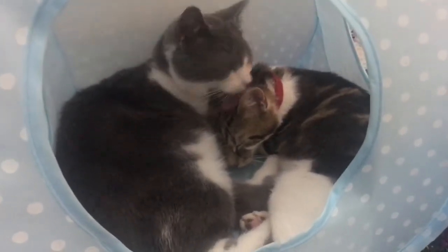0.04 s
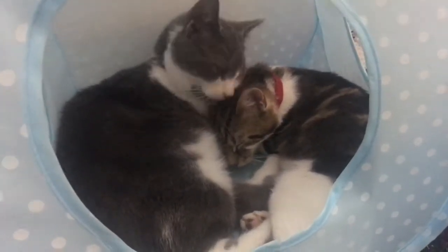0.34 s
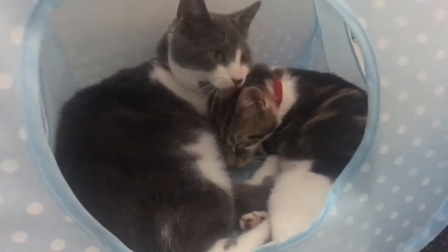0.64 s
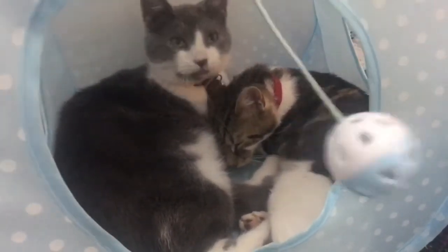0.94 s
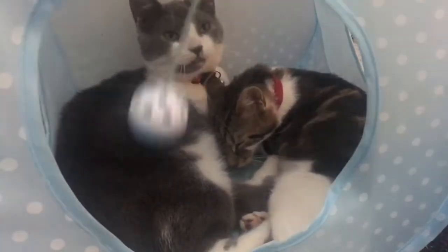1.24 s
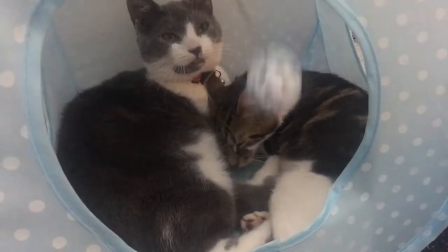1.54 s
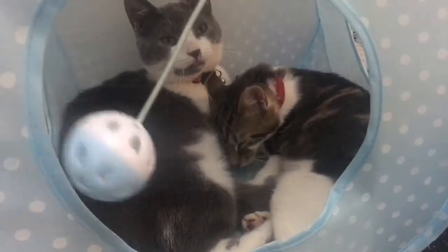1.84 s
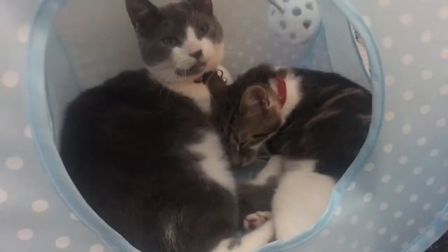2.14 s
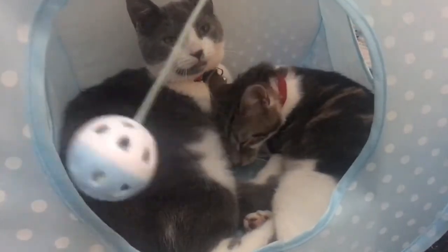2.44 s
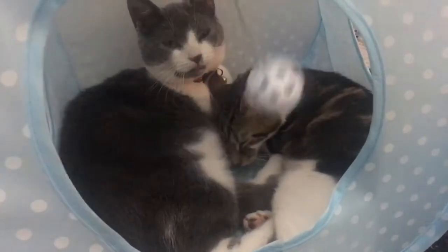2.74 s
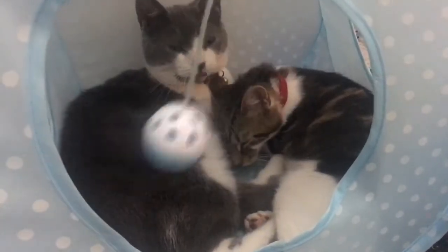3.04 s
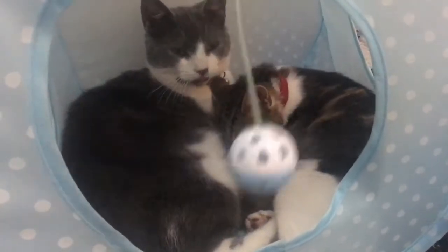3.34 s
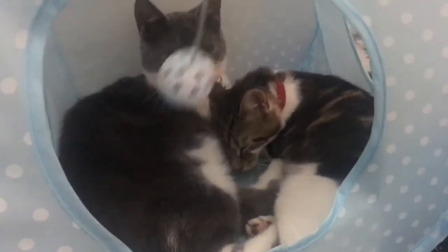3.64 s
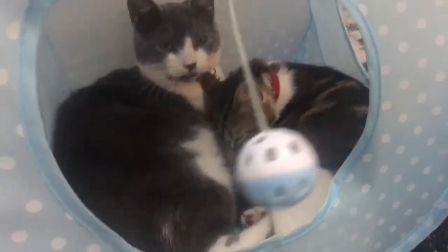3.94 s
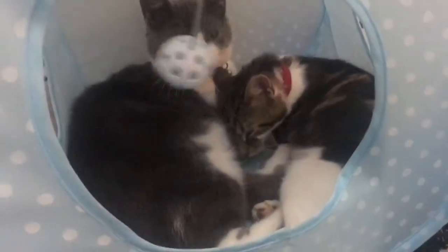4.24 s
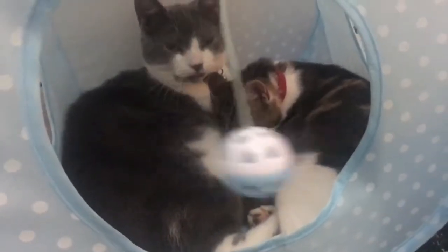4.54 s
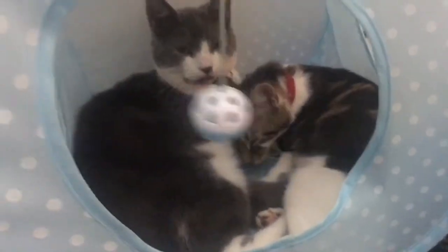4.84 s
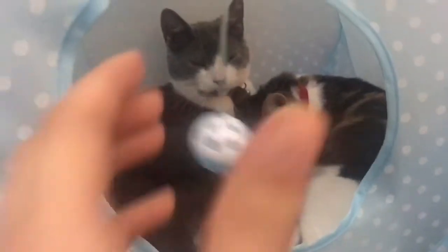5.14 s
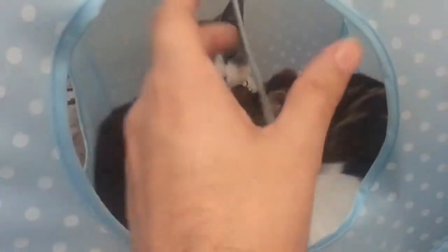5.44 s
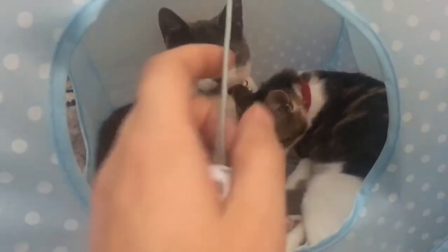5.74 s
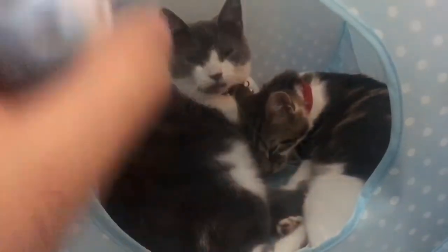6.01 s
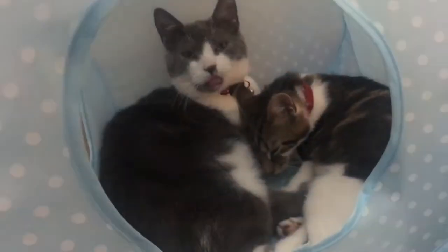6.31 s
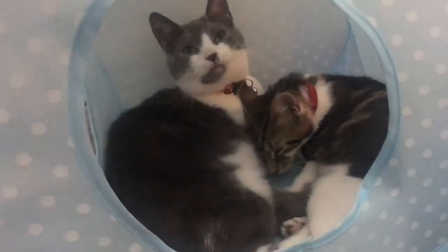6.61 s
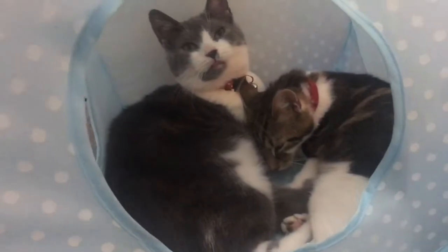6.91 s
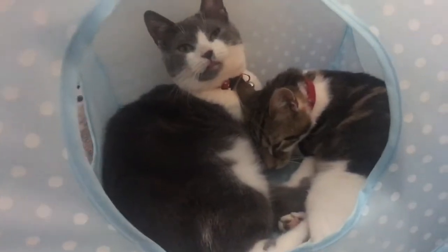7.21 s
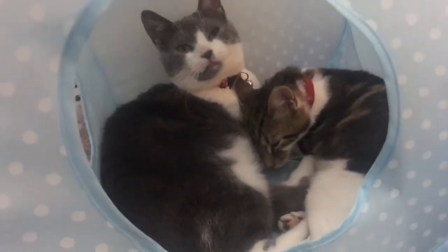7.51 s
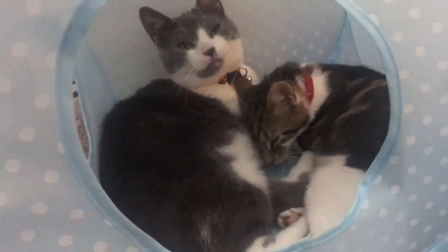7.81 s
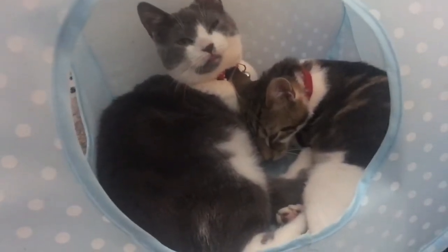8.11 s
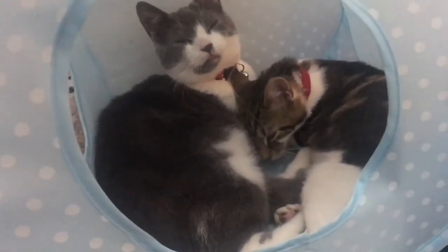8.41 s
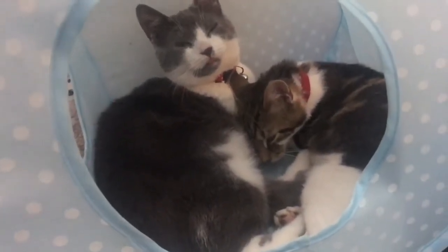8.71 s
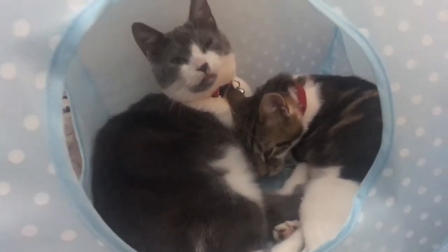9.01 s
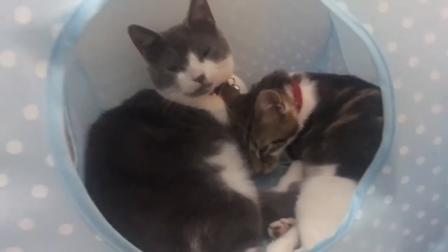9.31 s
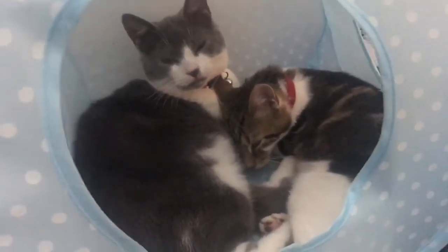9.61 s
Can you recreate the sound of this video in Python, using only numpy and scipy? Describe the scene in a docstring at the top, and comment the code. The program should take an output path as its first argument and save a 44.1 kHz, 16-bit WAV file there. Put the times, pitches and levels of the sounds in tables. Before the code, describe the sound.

A small metal bell inside a plastic toy ball is heard close up in a quiet room. At about 0.4 seconds the ball is jerked on its string, and the bell gives a bright, high jingle with plastic clicks and a soft thud, dying down by 1 second. Very faint, sparse tinkles continue until about 3 seconds as it swings. Dull low rumbles and a few soft handling bumps follow, with a sharper tap near 4.7 seconds and faint brushing around it. From about 5.5 to 6.1 seconds a hand grabs the ball and the bell rattles busily, its pellet hopping and rolling. Lighter tinkles and soft brushes go on until 7.5 seconds, with a last tiny one near 8. A dry tick comes near 8.9 seconds and a soft bump near 9.7, over a steady low hush.

```python
"""A pellet bell jingles inside a plastic lattice ball, swung on a string close by in a quiet room.
The ball is jerked, tinkles faintly as it swings, then rattles in a hand and settles.
The pellet strikes, hops and rolls in a slit steel shell, ringing its modes; the bell clicks on the
plastic. Soft bumps, ticks and brushes of handling and some dull rumbles lie over the room's hush."""
import sys
import numpy as np
from scipy import signal
from scipy.fft import rfft, irfft, next_fast_len
from scipy.io import wavfile
from scipy.ndimage import uniform_filter1d

SR = 44100
rng = np.random.default_rng(int(sys.argv[2]) if len(sys.argv) > 2 else 0)


def file_out(sig):
    """Save sig as 16-bit WAV at sys.argv[1]."""
    # one column per channel
    cols = np.atleast_2d(sig).T
    # limit, then scale
    lim = np.clip(cols, -1, 1)
    pcm = np.round(lim * 32767).astype(np.int16)
    wavfile.write(sys.argv[1], SR, pcm)


N = 434826
T = np.arange(N) / SR
GRABBED_S = 5.4  # ball held from here on
REST_DB = -88  # no hops or pings below this roll level


# Pellet strikes, relative levels:
# (time [s], clash [dB], 8 kHz partials [dB], upper note [dB], lower note [dB], plastic click [dB])
STRIKES = [(.402, -37, -41, -43, -52, -41), (.41, -11.5, -35, -43, -40, -29.5),
           (.4206, -12.5, -19, -28.5, -55, -41), (.4316, -14, -18, -46, -49, -33),
           (.4387, -11, -16.5, -34, -59, -25), (.4706, -8, -11, -33.5, -33.5, -37),
           (.4873, -8, -19, -43, -53, -24.5), (.4967, -12, -36, -35, -52, -39),
           (.5191, -15, -45, -53, -51, -53), (.5667, -28, -31.5, -59, -53, -38),
           (.5746, -21.5, -52, -41, -45, -43), (.5988, -30, -39, -44, -54, -47),
           (.633, -34, -36.5, -51, -53, -42.5), (.714, -22, -23.5, -63, -53, -61),
           (.73, -19, -26, -44.5, -58, -54), (.7592, -18.5, -40, -34, -53, -45),
           (.767, -16.5, -36, -39, -46.5, -62), (.791, -19.5, -51, -49, -53, -63),
           (.874, -37, -66, -51.5, -70, -47), (.946, -39, -62, -51, -75, -66),
           (1.0065, -45, -53, -59, -75, -59), (1.0768, -33.5, -61, -79, -74, -47),
           (1.1103, -35, -61, -69, -75, -52.5), (1.1949, -50, -72, -80, -85.5, -70.5),
           (1.6196, -59.5, -83, -85.5, -87, -77.5), (1.733, -59, -81.5, -88, -84, -77),
           (1.94, -56, -87.5, -80, -79, -75), (2.4703, -56, -81, -85, -90, -78),
           (2.5536, -50.5, -80, -76.5, -86.5, -69.5), (2.6887, -55.5, -78.5, -78, -87, -76),
           (2.906, -54.5, -85.5, -85, -81, -78.5), (3.0344, -58.5, -80, -82.5, -83, -78),
           (5.5536, -37, -52, -47.5, -60, -46), (5.5847, -31, -35, -46, -69, -41),
           (5.6032, -23, -39, -36, -68, -38.5), (5.645, -29, -55, -46, -39, -75),
           (5.688, -20, -45, -64, -43, -72), (5.7355, -23, -31.5, -54, -50, -68),
           (5.7675, -19, -41, -51, -60, -39), (5.7783, -21, -46, -35.5, -57, -37.5),
           (5.7924, -18, -34, -35, -41, -36), (5.8105, -20, -42, -32, -46, -32.5),
           (5.8262, -11.5, -30, -44, -40, -42), (5.8375, -29, -25.5, -43, -38, -38),
           (5.8515, -18.5, -31, -45, -44, -47), (5.8824, -20, -44, -52, -45, -62),
           (5.897, -15.5, -49, -54, -40, -58), (5.9269, -20, -47, -31.5, -57, -35),
           (5.9564, -33, -57, -38, -68, -36), (5.9762, -17.5, -42, -37, -51, -41),
           (6.0145, -17.5, -57, -56, -48, -51), (6.0355, -26, -48, -56, -66, -43),
           (6.092, -27, -55, -41.5, -63, -66), (6.123, -26, -62, -41, -69, -61),
           (6.3075, -39.5, -60, -58, -73, -53), (6.3529, -49, -51.5, -76, -81, -52.5),
           (6.4338, -39, -55, -71, -81, -62), (6.4911, -40, -45, -56, -68, -67),
           (6.5525, -30, -58, -72, -60, -52), (6.755, -43, -69, -64, -73, -63),
           (6.833, -29.5, -60, -55, -61, -47.5), (6.8628, -32, -59, -66, -54, -51),
           (6.9046, -32, -52, -61, -64, -74), (6.9848, -38, -50, -55, -48.5, -56),
           (7.0668, -44, -47, -56, -58, -49.5), (7.1901, -39, -74, -50, -70, -45),
           (7.222, -51, -69, -46, -57.5, -54), (7.4607, -46, -63.5, -64, -83, -59),
           (7.4723, -49, -54, -64, -58.5, -57), (8.05, -45.5, -69.5, -67.5, -70, -62)]
# Slit steel shell modes: (frequency [Hz], level [dB], t60 [s])
BELL_MODES = [(2972, 0, .22), (3510, -7, .25), (4696, 0, .4), (4716, -4, .3), (4808, -4, .35),
              (5324, 0, .5), (5350, -4, .3), (8386, -4, .12), (8690, -3, .05), (8735, -4, .07),
              (8895, -1, .05), (9465, -10, .06), (10090, -5, .05), (10820, -9, .08), (11014, -2, .19),
              (11280, -6, .06), (11480, -7, .07), (11855, -7, .15), (12140, -5, .15), (12525, -6, .08),
              (12770, -2, .08), (12910, 0, .19), (13765, -4, .07), (13980, -6, .07), (14700, -10, .05)]
# Edges between the deep, lower, upper, 8 kHz and shimmer mode families: (frequency [Hz])
FAMILY_EDGES_HZ = [4000, 5000, 7000, 9300]
def bell(hits, gentle_db=-58, hard_db=-31, held_damping=1.15, detune=0.000799, max_samples=12000):
    """Each strike hits a new spot, rings a new detuned mix of modes and partly chokes the old ring."""
    hz, db, t60 = np.transpose(BELL_MODES)
    family = np.digitize(hz, FAMILY_EDGES_HZ)
    hits = sorted(hits)
    ends_s = [hit[0] for hit in hits[1:]] + [T[-1]]
    out, state = np.zeros(N), np.zeros(len(hz), complex)
    for (s, clash_db, partials_db, upper_db, lower_db, click_db), end_s in zip(hits, ends_s):
        softness = np.interp(clash_db, [gentle_db, hard_db], [1, 0])
        spot = undb(db + 5.5 * rng.standard_normal(len(hz)))
        mix = spot * t60 ** (0.68 * softness)  # light touches favour long-ringing modes
        mix /= np.sqrt(np.bincount(family, mix ** 2))[family]
        shimmer_db = clash_db - 14 - 0.3 * (max(clash_db, gentle_db) + 30.5)
        deep_db = (click_db + lower_db) / 2 - 4 - 20 * rng.random()  # woken by knocks on the plastic
        force = undb([deep_db, lower_db - 3, upper_db - 3, partials_db - 3, shimmer_db])[family]
        surviving = 0.46 ** max(1 - softness, 0.18)
        state = surviving * state + force * mix * rng.choice([-1, 1], len(hz))
        detuned_hz = hz * (1 + detune * rng.standard_normal(len(hz)))
        damping = 1 if s < GRABBED_S else held_damping
        step = np.exp((2j * np.pi * detuned_hz - np.log(1000) * damping / t60) / SR)
        n = np.clip(int(end_s * SR) - int(s * SR), 1, max_samples)
        ring = state * np.cumprod(np.broadcast_to(step, (n, len(hz))), axis=0)
        add(out, s, ring.imag.sum(axis=1))
        state = ring[-1]
    return out


# Metal clash spectrum: (frequency [Hz], level [dB])
CLASH_SPECTRUM = [(6000, -15.5), (7700, -15), (8600, -5), (9400, -3.5), (10050, -0.5), (10500, -6.5),
                  (11300, 7.5), (12800, 4), (13300, -5.5), (13800, -2), (16000, -7)]
def clash(t60_s, count=9, size=1024):
    """While the pellet presses on the steel, the high modes are detuned and die at once."""
    t = T[:size]
    hz = rng.uniform(6400, 15800, count)
    gain = undb(np.interp(hz, *np.transpose(CLASH_SPECTRUM))) * rng.standard_normal(count)
    partials = np.sin(2 * np.pi * (hz[:, None] * t + rng.random((count, 1))))
    return gain @ partials / np.linalg.norm(gain) * fade(t, t60_s)


# Plastic click spectrum: (frequency [Hz], level [dB])
PLASTIC_SPECTRUM = [(150, -18), (500, -8.5), (1200, -4.5), (2500, -0.5), (4000, 1.5), (6500, 4), (9000, -8),
                    (16000, -32.5)]
def contacts(hits, free_t60_s=0.028, held_t60_s=0.014, bounce_gap_s=(0.0011, 0.0036), bounce_db=-7):
    """The pellet hits the steel: a metal clash with two rebounds, shorter when held.
    The bell clicks on the plastic."""
    out = np.zeros(N)
    for s, clash_db, *_, click_db in hits:
        t60_s = free_t60_s if s < GRABBED_S else held_t60_s
        first_db = clash_db - 7 + min(clash_db + 45, 0) / 2  # the lightest touches hardly clash
        for bounce, lag_s in enumerate(np.cumsum([0, *rng.uniform(*bounce_gap_s, 2)])):
            add(out, s + lag_s, undb(first_db + bounce * bounce_db) * clash(t60_s))
        click = burst(0.0052, PLASTIC_SPECTRUM)
        rattle = undb(-17) * burst(0.0418, PLASTIC_SPECTRUM)
        add(out, s, undb(click_db + 6) * (click + rattle))
    return out


# Pellet rolls, one per toss or turn: (time [s], length [s], level [dB])
ROLLS = [(0.197, 0.1, -72.5), (0.395, 0.023, -35.5), (0.473, 0.037, -31), (0.543, .13, -52),
         (0.719, 0.083, -40.5), (0.857, .11, -58), (1.107, .03, -70), (2.32, 0.82, -83.5),
         (5.525, 0.057, -49), (5.598, 0.11, -44), (5.78, 0.093, -39.5), (5.881, 0.18, -47),
         (6.114, .11, -55.5), (6.31, 0.034, -63), (6.44, .11, -59), (6.732, 0.052, -60),
         (6.838, 0.064, -54.5), (6.98, 0.033, -52.5), (7.07, 0.048, -56.5), (7.2, 0.073, -61),
         (7.468, .025, -59.5)]
def roll_envelope(attack_s=0.012, t60_s=0.16):
    """Strength of the pellet's rolling: each roll starts fast, holds and runs out."""
    power, t = np.zeros(N), T[:32768]
    for s, length_s, db in ROLLS:
        attack = np.minimum(t / attack_s, 1)
        release = fade(np.maximum(t - length_s, 0), t60_s)
        add(power, s, (undb(db) * attack * release) ** 2)
    return np.sqrt(power)


# Pellet hop, relative to the roll:
# (clash [dB], 8 kHz partials [dB], upper note [dB], lower note [dB], plastic click [dB])
HOP_DB = [3.5, -10.5, -10.5, -12, -12]
def hops(motion, per_s=50, scatter_db=5):
    """The rolling pellet hops unevenly; each hop is a small strike that scales with the roll."""
    count = int(T[-1] * per_s) - 1
    times_s = (np.arange(count) + rng.random(count)) / per_s
    roll_db = 20 * np.log10(np.interp(times_s, T, motion) + 1e-9)
    db = roll_db[:, None] + np.array(HOP_DB) + scatter_db * rng.standard_normal((count, len(HOP_DB)))
    return [tuple(row) for row in np.column_stack([times_s, db])[roll_db > REST_DB]]


def rolling(motion, skips_per_s=600, uneven_db=6, width_hz=110, wander_db=7):
    """Tiny pellet skips excite the damped high modes; the mix shifts as the contact point moves."""
    skips = (rng.random(N) < skips_per_s / SR) * rng.standard_normal(N)
    skips *= undb(uneven_db * wander(90))
    ring = sum(undb(db + wander_db * wander(35)) * resonate(skips, hz, width_hz)
               for hz, db, _ in BELL_MODES if hz > FAMILY_EDGES_HZ[2])
    scrape = unit(colour(skips, [(3000, -41)] + list(CLASH_SPECTRUM)))
    plastic = unit(colour(skips, PLASTIC_SPECTRUM))
    steel = undb(-6) * unit(ring) + undb(-4) * pings(motion) + undb(-9) * scrape
    return motion * (steel + undb(-15) * plastic)


def pings(motion, per_s=450, t60_s=0.022, scatter_db=8):
    """Short pings, each at its own pitch, as the pellet skids on the steel."""
    out, t = np.zeros(N), T[:1024]
    when, where, strength = rng.random((int(T[-1] * per_s), 3)).T
    pitches_hz = 7500 + 8300 * where
    levels_db = np.interp(pitches_hz, *np.transpose(CLASH_SPECTRUM)) + scatter_db * (2 * strength - 1)
    events = np.column_stack([when * T[-1], pitches_hz, levels_db])
    moving = motion > undb(REST_DB)
    for s, hz, db in events[moving[(when * N).astype(int)]]:
        add(out, s, undb(db) * fade(t, t60_s) * np.sin(2 * np.pi * hz * t))
    return out / out[moving].std()


# Handling bumps: (time [s], thud level [dB], thud pitch [Hz], tap level [dB])
BUMPS = [(0.413, -32.5, 176, -38), (0.419, -31.5, 295, -37), (0.431, -25, 68.4, -60),
         (0.501, -37.5, 130.7, -61.5), (3.565, -38.5, 120, -52), (4.011, -46, 161.7, -60),
         (4.714, -31, 122, -27.5), (4.714, -36.5, 508, -42), (7.345, -46.5, 121.2, -72),
         (7.466, -49, 300, -55.5), (9.65, -39, 102.6, -48)]
def bumps(thud_t60_s=0.038, tap_crest_s=0.00025):
    """Each handling bump is a soft tap and a damped thud."""
    out, t = np.zeros(N), T[:8192]
    for s, thud_db, hz, tap_db in BUMPS:
        thud = np.sin(2 * np.pi * hz * t) * fade(t, thud_t60_s)
        add(out, s, undb(thud_db) * thud - undb(tap_db) * swell(t, tap_crest_s))
    return out


# Handling ticks: (time [s], level [dB])
TICKS = [(4.7015, -44), (8.9225, -35)]
# Tick spectrum: (frequency [Hz], level [dB])
TICK_SPECTRUM = [(100, -29), (300, 16), (600, 13.5), (1200, 3.5), (2600, 3), (5500, -5.5), (8000, -13.5),
                 (12000, -3.5), (16000, -19)]
def ticks(t60_s=0.0058, tail_t60_s=1.0, tail_db=-25):
    """Dry cracks of handling, each with a faint tail."""
    out = np.zeros(N)
    for s, db in TICKS:
        add(out, s, undb(db) * burst(t60_s, TICK_SPECTRUM))
        add(out, s, undb(db + tail_db) * burst(tail_t60_s, TICK_SPECTRUM, size=16384))
    return out


# Hand strokes: (time [s], time to crest [s], level [dB])
BRUSHES = [(4.51, 0.02, -67.5), (4.551, 0.019, -71.5), (4.59, 0.011, -67), (5.282, 0.012, -60),
           (5.306, 0.0027, -60), (6.31, 0.011, -76), (6.35, 0.011, -81), (6.461, 0.014, -66.5),
           (6.621, 0.015, -63), (6.7, 0.02, -64.5), (6.8, 0.024, -59.5), (7.1, 0.031, -64),
           (7.2, 0.024, -65), (7.336, 0.0089, -67.5)]
def brushes(grain_db=5, size=8192):
    """A hand brushes string and fabric in short grainy swishes."""
    out = np.zeros(N)
    spectrum = [(200, -1), (1000, 1), (2500, -3), (5000, -2), (9000, -6.5), (16000, -11.5)]
    for s, crest_s, db in BRUSHES:
        grains = rng.standard_normal(size) * undb(grain_db * rng.standard_normal(size))
        swish = unit(colour(grains, spectrum))
        add(out, s, undb(db) * swish * swell(T[:size], crest_s) ** 2)
    return out


# Handling rustle spectrum: (frequency [Hz], level [dB])
RUSTLE_SPECTRUM = [(20, -30), (80, -7.5), (250, 1), (450, 3.5), (750, -10), (1100, -5.5), (2500, -18),
                   (4500, -15), (14000, -27.5)]
def rustle(motion, floor_db=-79):
    """Soft low handling noise that grows while the ball moves."""
    effort = np.abs(uniform_filter1d(motion, 13000)) ** 0.45
    gain = np.hypot(undb(floor_db), undb(-50) * effort)
    return gain * unit(colour(rng.standard_normal(N), RUSTLE_SPECTRUM))


# Dull rumbles: (time [s], level [dB])
RUMBLES = [(3.079, -55), (4.25, -59.5), (4.97, -61), (5.59, -59), (6.38, -60.5), (7.05, -67.5), (7.45, -77),
           (8.25, -65), (9.119, -63.5), (9.721, -59.5)]
# Rumble resonances: (frequency [Hz], width per filter pass [Hz], level [dB], time to crest [s])
RUMBLE_MODES = [(59.4, 13, 4, 0.12), (65.7, 19.4, 1, 0.13), (110.5, 11, -3, 0.027),
                (152.6, 16.2, 1.5, 0.063), (203.2, 19.6, -9, 0.131), (336, 104, -9, 0.041)]
def rumbles(size=32768, run_in=6000):
    """Noise swells in a few low resonances, each at its own pace."""
    out = np.zeros(N)
    for s, db in RUMBLES:
        for hz, width_hz, mode_db, crest_s in RUMBLE_MODES:
            envelope = swell(T[:size], crest_s) ** 0.8
            noise = rng.standard_normal(size + run_in)
            band = resonate(resonate(noise, hz, width_hz), hz, width_hz)[run_in:]
            rms = undb(db + mode_db) * np.sqrt(np.mean(envelope ** 2))
            add(out, s, rms * unit(envelope * band))
    return out


# Room noise spectrum: (frequency [Hz], relative density [dB])
HUSH_SPECTRUM = [(15, -35.5), (25, -7.5), (48, 1), (92, -5.5), (114, -7.5), (195, -11), (335, -17.5),
                 (384, -19), (863, -26), (2050, -30.5), (5000, -36), (9320, -38), (10400, -41.5),
                 (12500, -37.5), (16000, -46)]
def hush(level_db=-63):
    """Steady room noise."""
    return undb(level_db) * unit(colour(rng.standard_normal(N), HUSH_SPECTRUM))


def room(x, t60_s=0.16, wet_db=-18, predelay_s=0.004):
    """Add the short, weak tail of a furnished room."""
    t = T[:16384]
    tail = rng.standard_normal(len(t)) * fade(t, t60_s) * (t > predelay_s)
    return x + undb(wet_db) * signal.fftconvolve(x, tail / np.linalg.norm(tail))[:N]


def undb(db):
    """Decibels to gain."""
    return np.exp(np.asarray(db) / 20 * np.log(10))


def unit(x):
    """Scale to rms 1."""
    return x / np.sqrt(np.mean(x ** 2))


def fade(t, t60_s):
    """Exponential decay, 60 dB down at t60_s."""
    return np.exp(-np.log(1000) * t / t60_s)


def swell(t, crest_s):
    """Rise to 1 at crest_s, then decay."""
    return t / crest_s * np.exp(1 - t / crest_s)


def wander(rate_hz):
    """Random drift, soft-limited to +/-1."""
    knots_s = np.arange(0, T[-1] + 1, 1 / rate_hz)
    return np.tanh(3 * np.interp(T, knots_s, rng.standard_normal(len(knots_s))))


def add(out, s, x):
    """Mix x into out from time s."""
    i = int(s * SR)
    out[i:i + len(x)] += x[:N - i]


def colour(x, spectrum):
    """Minimum-phase filter from (frequency [Hz], level [dB]) points."""
    hz, db = np.transpose(spectrum)
    n = 2 * next_fast_len((len(x) + 1) // 2, True)
    bins_hz = np.maximum(np.arange(n // 2 + 1) * SR / n, 1)
    gain = undb(np.interp(np.log(bins_hz), np.log(hz), db))
    cepstrum = irfft(np.log(gain))
    cepstrum[1:n // 2] *= 2
    cepstrum[n // 2 + 1:] = 0
    return irfft(rfft(x, n) * np.exp(rfft(cepstrum)), n)[:len(x)]


def resonate(x, hz, width_hz):
    """Two-pole resonance, gain 1 at the centre."""
    return signal.lfilter(*signal.iirpeak(hz, hz / width_hz, fs=SR), x)


def burst(t60_s, spectrum, size=2048):
    """Coloured crack of noise, peak 1."""
    x = colour(rng.standard_normal(size) * fade(T[:size], t60_s), spectrum)
    return x / np.abs(x).max()


def scene():
    """Bell, ball and handling in the room, over the background; mono."""
    motion = roll_envelope()
    background = rumbles() + hush() + rustle(motion)
    roll = rolling(motion)
    handling = bumps() + ticks() + brushes()
    hits = list(STRIKES) + hops(motion)
    return (room(bell(hits) + contacts(hits) + roll + handling) + background)[None]


def record(dry, low_cut_hz=36, top_hz=15800):
    """The microphone thins the deep bass and the recorder cuts the top."""
    thinned = signal.sosfilt(signal.butter(2, low_cut_hz, "high", fs=SR, output="sos"), dry)
    return signal.sosfilt(signal.ellip(10, 0.2, 70, top_hz, fs=SR, output="sos"), thinned)


dry = scene()
out = record(dry)
file_out(out)
```